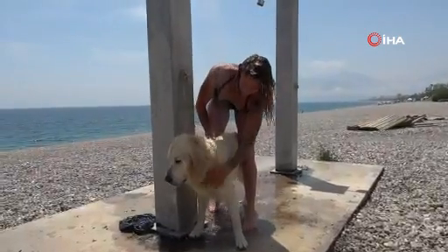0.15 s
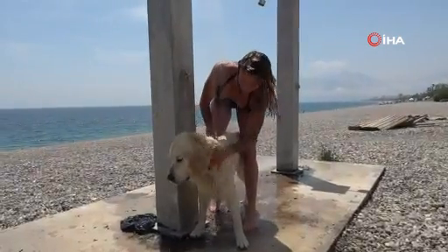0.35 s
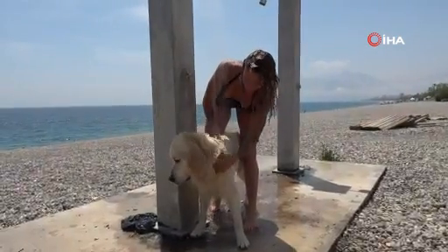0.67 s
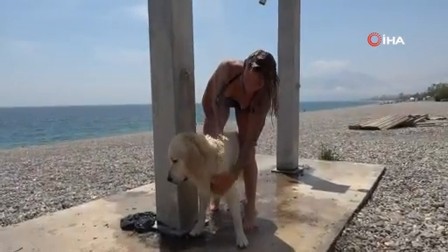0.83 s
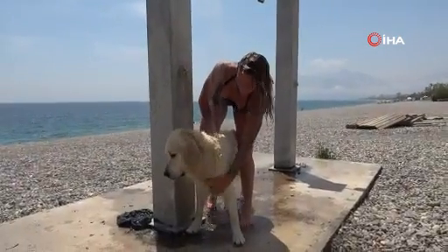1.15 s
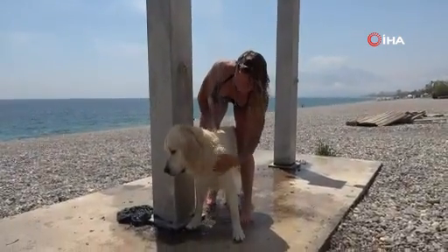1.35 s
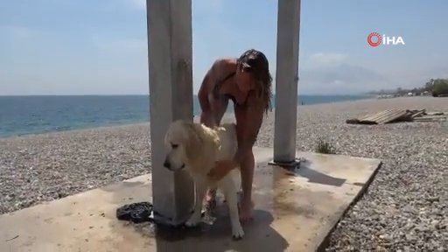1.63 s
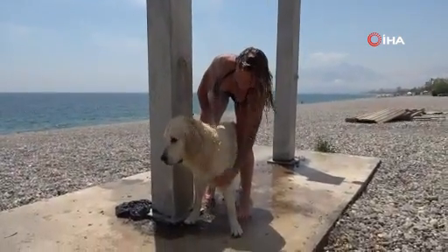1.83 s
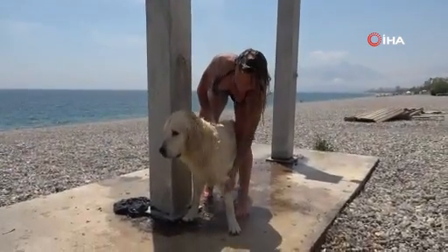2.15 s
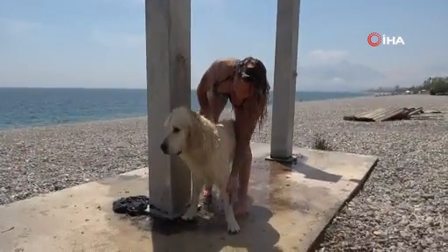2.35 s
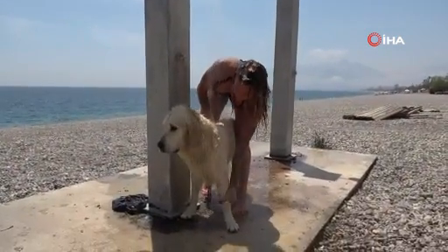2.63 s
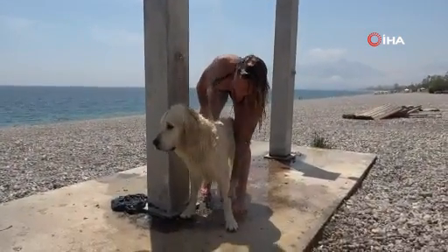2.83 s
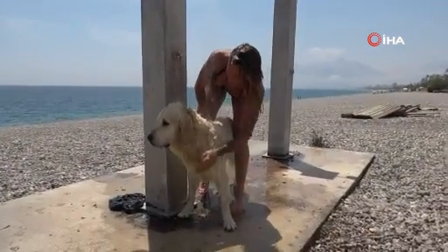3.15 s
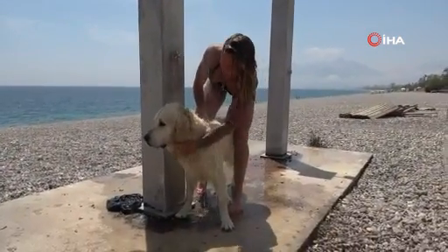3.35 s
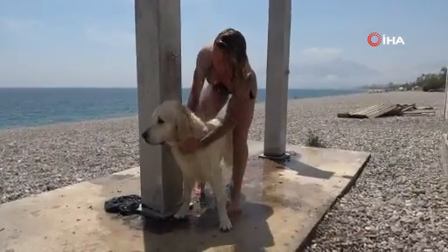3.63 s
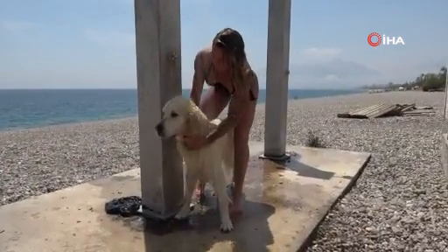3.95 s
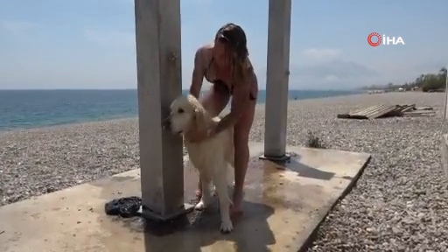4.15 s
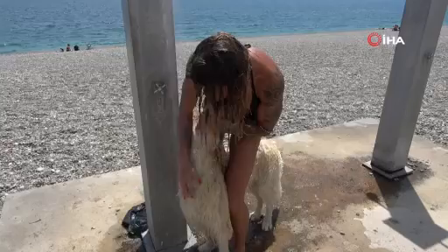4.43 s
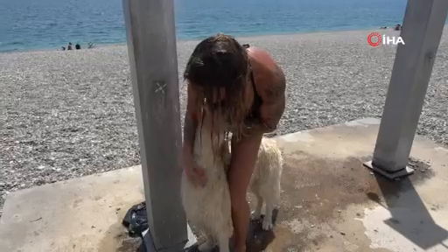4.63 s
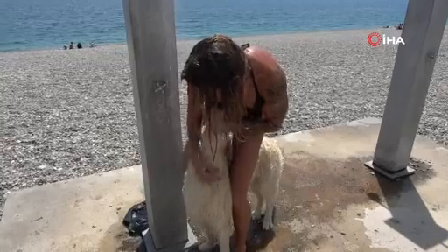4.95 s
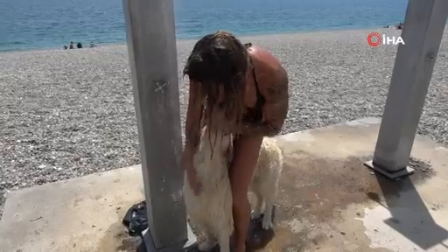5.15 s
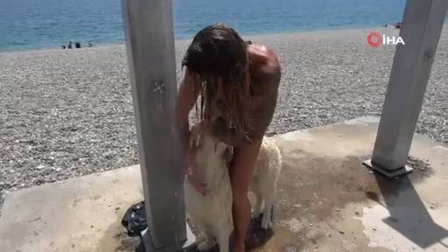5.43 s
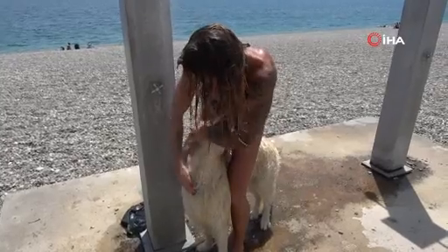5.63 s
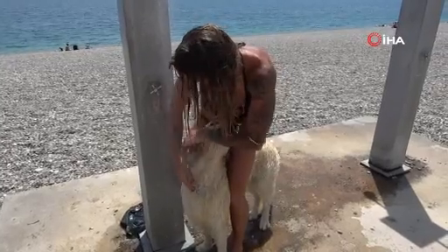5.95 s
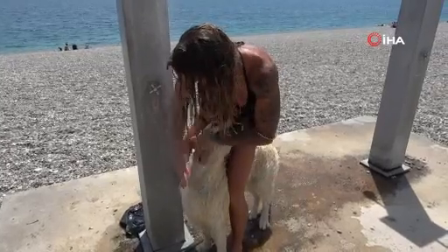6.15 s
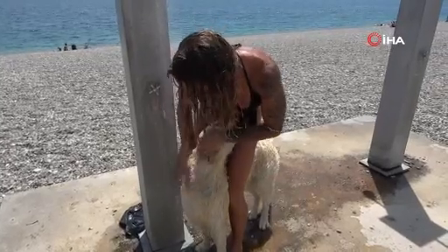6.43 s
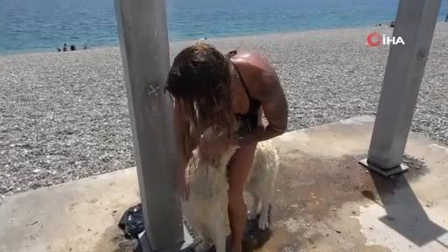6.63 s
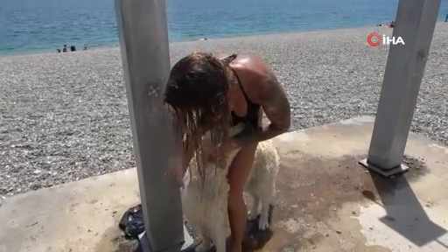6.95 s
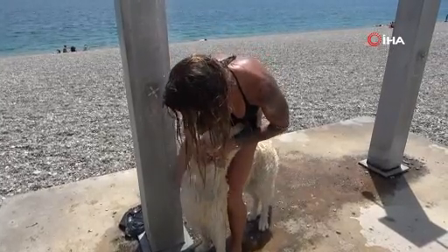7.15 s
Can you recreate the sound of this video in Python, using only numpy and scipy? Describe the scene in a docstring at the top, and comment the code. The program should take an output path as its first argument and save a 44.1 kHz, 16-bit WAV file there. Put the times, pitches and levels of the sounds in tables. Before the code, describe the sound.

A hand-held stereo microphone hears fine shower spray over faint, steady sea wash. At first the water is thin and distant, with occasional drops, hollow handling taps, short bursts of rumbling wind and two thin bird chirps. Past the middle a hard clunk and a tiny dip lead to a closer view: brighter hiss in uneven surges, many sharp slaps on wet concrete and rising drip plinks.

```python
"""An outdoor shower hisses onto a dog and a concrete pad on a pebble beach; later the spray is nearer.
Shaped noise and showers of tiny drop bursts make the spray; larger drops slap the wet concrete and
rising sine rings drip into puddles. Noise bursts through narrow resonances knock on the hollow housing
of the hand-held camera, bursts of low wind noise buffet its microphone, and a small bird chirps twice
in arched sines. Behind them lie the steady wash of the shore and faint swells of low band noise."""
import sys
import numpy as np
from scipy import signal
from scipy.fft import rfft, irfft, next_fast_len
from scipy.io import wavfile
from scipy.ndimage import uniform_filter1d

SR = 44100
rng = np.random.default_rng(int(sys.argv[2]) if len(sys.argv) > 2 else 0)


def store_pcm(level_fs):
    """Save levels as 16-bit WAV."""
    pcm = np.round(np.clip(level_fs, -1, 1) * 32767).astype(np.int16)
    wavfile.write(sys.argv[1], SR, np.atleast_2d(pcm).T)


N = 321489
TIME = np.arange(N) / SR
NEAR_S = 4.46  # from here on the spray is near

# resonances of the camera housing: centre_hz, width_hz, level_db
HOUSING_MODES = [(876, 28, -6), (1006, 62, 1.5), (1142, 39, -5.5), (1367, 53, -0.5), (1537, 39, 3),
                 (1728, 95, -2), (1960, 118, 2), (2067, 21, 6.5), (2243, 96, -1), (2940, 220, 0)]


def gain_of(db):
    """Decibels to gain."""
    return 10 ** (np.asarray(db) / 20)


def evened(x):
    """Scales to rms 1."""
    return x / np.sqrt(np.mean(x ** 2) + 1e-20)


def read(points, hz):
    """Reads a spectrum on a log-frequency axis."""
    f, value = np.transpose(points)
    return np.interp(np.log(hz + 1), np.log(f + 1), value)


def curve(rows, axis=1):
    """Gain over time from one dB column of a table."""
    columns = np.transpose(rows)
    return gain_of(np.interp(TIME, columns[0], columns[axis]))


def colour(x, points):
    """Gives a sound a spectrum, at rms 1."""
    length = x.shape[-1]
    size = next_fast_len(length + 512)
    gain = gain_of(read(points, np.fft.rfftfreq(size, 1 / SR)))
    return evened(irfft(rfft(x, size) * gain, size)[..., :length])


def band(x, hz, octaves):
    """A broad causal resonance around hz."""
    edges = np.clip([hz / 2 ** (octaves / 2), hz * 2 ** (octaves / 2)], 5, SR / 2.2)
    return signal.sosfilt(signal.butter(1, edges, "band", fs=SR, output="sos"), x)


def add(mix, s, sound):
    """Adds a sound to the mix at s seconds."""
    part = mix[:, max(round(s * SR), 0):][:, :sound.shape[-1]]
    part += sound[..., :part.shape[-1]]


def drift(db, rate_hz, count=24):
    """A gain that wanders by chance: sines of random phase up to rate_hz, db rms in all."""
    t = np.arange(0, N / SR + .01, .005)
    rates = np.geomspace(rate_hz / 10, rate_hz, count)
    wave = sum(np.sin(2 * np.pi * (hz * t + rng.random())) for hz in rates)
    return gain_of(db * np.interp(TIME, t, evened(wave)))


def patchy_noise(patchy_db, flicker_db):
    """Noise with short patches in time and frequency and a flicker shared by all bands."""
    z = signal.stft(rng.standard_normal((2, N)), nperseg=256)[2]
    across_hz = uniform_filter1d(rng.standard_normal(z.shape[1:]), size=7, axis=0)
    patches = evened(uniform_filter1d(across_hz, size=5, axis=1))
    flicker = evened(uniform_filter1d(rng.standard_normal(z.shape[-1]), size=5))
    gain = gain_of(patchy_db * patches + flicker_db * flicker)
    return signal.istft(z * gain, nperseg=256)[1][:, :N]


def shower(hiss_db=0.9, drops_db=-3.0, splatter_db=2.24, bubbles_db=-9, far_hiss_db=0.54, far_splatter_db=-3.0):
    """Mist and drops hiss; heavier water splatters lower down, with a faint fizz of bubbles."""
    # the far spray, before the trims above: time_s, hiss_db, splatter_db of the water running off
    far_spray = [(0.0, -51, -53.5), (0.58, -50, -57), (4.0, -51.5, -55), (4.35, -52.5, -60.5)]
    # spectrum of the fine spray: freq_hz, level_db per Hz
    hiss_spectrum = [(1500, -24.5), (2600, -26), (3500, -10), (4900, -7.5), (6500, 0), (9300, 1.5),
                     (10800, -0.5), (12400, 0.5), (14400, -3.5), (15200, -13.5)]
    # spectrum of the water running off: freq_hz, level_db per Hz
    splatter_spectrum = [(1000, -31), (1900, -6), (2600, -11.5), (3400, -7.5), (4800, -8), (6500, -3.5),
                         (10000, -27)]
    near_hiss_db, near_splatter_db = -48, -64  # before the hiss and splatter trims

    far, flutter = TIME < NEAR_S, drift(db=0.97, rate_hz=20)
    far_mist = gain_of(far_hiss_db) * curve(far_spray, axis=1)
    far_flow = gain_of(far_splatter_db) * curve(far_spray, axis=2)
    # the steady spray and the surges add as powers
    mist = np.hypot(np.where(far, far_mist, gain_of(near_hiss_db)), surges(axis=2))
    flow = np.hypot(np.where(far, far_flow, gain_of(near_splatter_db)), surges(axis=3))

    fine = evened(patchy_noise(patchy_db=1.9, flicker_db=1.47))
    water = fine + gain_of(drops_db) * droplets(spread_db=4.0)
    hiss = gain_of(hiss_db) * mist * colour(water, hiss_spectrum)
    sheet = evened(patchy_noise(patchy_db=3.5, flicker_db=0.5))
    runoff = sheet + gain_of(bubbles_db) * bubbles(per_s=350, spread_db=1.5, t60=0.0084)
    splatter = gain_of(splatter_db) * flow * colour(runoff, splatter_spectrum)
    return flutter * (hiss + splatter)


def surges(axis):
    """Water surges off the coat: each swells, sags while it runs and dies away; their powers add."""
    # surges, before the shower's trims: start_s, length_s to the release, hiss_db, splatter_db, rise_s
    surge_rows = [(0.143, 0.048, -50, -63, .02), (2.32, 0.053, -49.5, -54, .06),
                  (4.122, 0.031, -57, -50.5, .03), (4.647, 0.17, -42, -49.5, 0.13),
                  (4.957, 0.24, -42.5, -48, 0.034), (5.3, .37, -43.5, -51, .02),
                  (6.002, 0.042, -43, -53, 0.028), (6.126, .12, -45, -55.5, 0.021),
                  (6.285, .39, -40, -44, 0.17), (6.685, 0.32, -43.5, -53.5, 0.057),
                  (7.164, .12, -40, -53, 0.067)]
    sag_db_per_s, release_s = 6, 0.052
    power = np.zeros(N)
    for row in surge_rows:
        start, length, rise = row[0], row[1], row[4]
        age = np.maximum(TIME - start, 0)
        release = np.exp(-np.maximum(age - length, 0) / release_s)
        swell = np.minimum(age / rise, 1)
        power += (swell * gain_of(row[axis] - sag_db_per_s * age) * release) ** 2
    return np.sqrt(power)


def droplets(spread_db, count=24):
    """A rain of small drops of many sizes and pitches, landing by chance."""
    drops_per_s = 700  # over all pitches
    out = np.zeros((2, N))
    for hz in np.geomspace(3500, 12000, count):
        sizes = gain_of(spread_db * np.minimum(rng.exponential(1, N), 4))
        hits = sizes * (rng.random(N) < drops_per_s / count / SR)
        drop = splat(hz, t60=0.066, crack_s=0.0012, spatter_db=-10.5, octaves=1.34)
        out += signal.oaconvolve(hits[None], drop, axes=1)[:, :N]
    return evened(out)


def splat(hz, t60, crack_s, spatter_db, octaves, top_hz=12800, tail_db=-12):
    """One drop: a sharp crack, then the spatter of its fragments; peak 1."""
    t = np.arange(SR // 12) / SR
    fall = np.exp(-t / crack_s) + gain_of(tail_db - 60 * t / max(t60, .002))
    spatter = gain_of(spatter_db) * fall
    push = signal.unit_impulse(len(t)) + rng.standard_normal((2, len(t))) * spatter
    limits = [hz / 2.7, min(top_hz, SR / 2.2)]
    limiter = signal.butter(3, limits, "band", fs=SR, output="sos")
    sound = signal.sosfilt(limiter, band(push, hz, octaves))
    return sound / abs(sound).max(axis=1, keepdims=True)


def bubbles(per_s, spread_db, t60):
    """Many tiny bubbles ring in the film of water on the concrete."""
    out = np.zeros((2, N))
    for s, pitch, size, pan in rng.random((round(per_s * N / SR), 4)):
        level = gain_of(-spread_db * np.log(size + 0.015))
        plink = level * bubble(2700 * 2.4 ** pitch, t60)
        add(out, s * N / SR, plink * np.array([[1], [2 * pan - 1]]))
    return evened(out)


def bubble(hz, t60, rise=2):
    """The ring of a trapped bubble rises from hz as it dies."""
    t = np.arange(SR // 25) / SR
    return gain_of(-60 * t / t60) * np.sin(2 * np.pi * hz * t * (1 + rise * t))


def slaps(level_db=1.5):
    """Large drops fall from the wet coat onto the concrete, each a crack and a spatter."""
    # large drops and splashes: time_s (sounding 1 ms later), level_db before level_db above, centre_hz
    slap_rows = [(0.165, -25.5, 5900), (0.214, -30, 7680), (0.455, -30, 5900), (1.605, -31, 6700),
                 (2.0906, -21.5, 7750), (2.1105, -32, 8230), (2.4068, -27.5, 6900), (2.6115, -33, 8300),
                 (2.9926, -30.5, 8290), (3.038, -29.5, 6200), (3.5217, -28.5, 10500), (3.9175, -31, 7260),
                 (4.1046, -27.5, 6470), (4.157, -31, 3490), (4.1638, -25, 7740), (4.3859, -35, 4720),
                 (4.6673, -30, 11000), (4.9406, -26, 9160), (4.9866, -25.5, 6100), (4.99, -22.5, 7190),
                 (5.1504, -24, 7000), (5.3127, -26, 10500), (5.321, -24.5, 6500), (5.5273, -29, 9400),
                 (5.6488, -23, 7740), (5.7387, -22, 9400), (5.9463, -35, 9400), (5.9906, -29.5, 10400),
                 (6.0267, -26, 7360), (6.1155, -27, 8970), (6.1619, -25.5, 6100), (6.4667, -27.5, 4980),
                 (6.4877, -24, 5000), (6.5985, -21, 5860), (6.9508, -22, 8500), (7.1195, -27.5, 10000)]
    out = np.zeros((2, N))
    for s, db, hz in slap_rows:
        sound = splat(hz, t60=0.042, crack_s=0.0016, spatter_db=-11.0, octaves=0.43)
        add(out, s + 0.001, gain_of(db + level_db) * sound)
    return out


def drips(level_db=0, t60=0.023):
    """Single drips plink into the puddles, each the ring of a trapped bubble."""
    # drips: start_s, level_db, starting pitch_hz
    drip_rows = [(0.561, -45, 2720), (1.5279, -39.5, 3820), (4.9783, -40, 3500), (5.1265, -39, 3400),
                 (5.891, -44, 1530), (6.0267, -41, 3690), (6.339, -39, 2000), (6.4683, -34, 3900),
                 (6.498, -38, 3530), (6.5998, -39, 4750), (6.6128, -31.5, 3670), (7.226, -40, 2820)]
    out = np.zeros((2, N))
    for s, db, hz in drip_rows:
        add(out, s, gain_of(db + level_db) * bubble(hz, t60))
    return out


def knocks(soft_db=-1.0, hard_db=-1):
    """Soft knocks ring the housing, and one hard, rattling clunk has a ring of its own."""
    # soft knocks on the housing, before soft_db: start_s, level_db
    knock_rows = [(0.0833, -42), (0.1635, -42), (0.617, -34.5), (1.0124, -42), (1.116, -42.5),
                  (1.4348, -37), (1.9135, -31.5), (2.292, -34), (2.333, -34.5), (2.799, -36.5),
                  (2.8422, -40), (3.2914, -35.5), (3.691, -36), (4.0467, -36.5), (4.3708, -39),
                  (4.481, -33.5), (4.8797, -33.5), (5.0383, -41), (5.2977, -37), (5.414, -38),
                  (5.7633, -41), (6.163, -33), (6.338, -40), (6.6638, -37.5)]
    # the bumps of the clunk, before hard_db: start_s, level_db
    clunk_rows = [(4.1046, -23), (4.111, -26), (4.1536, -27)]
    # resonances of the clunk: centre_hz, width_hz, level_db
    clunk_modes = [(960, 21, -2.5), (1070, 46, -21), (1500, 30, -0.5), (1627, 12, -0.5), (2050, 42, 2),
                   (2210, 58, 1), (2480, 25, -19)]
    soft = bumps(knock_rows, HOUSING_MODES, t60=0.25, clatter_db=-6, grit_db=2.0, tick=0.67)
    hard = bumps(clunk_rows, clunk_modes, t60=.15, clatter_db=-5.5, grit_db=1.5, tick=0.34)
    return gain_of(soft_db) * soft + gain_of(hard_db) * hard


def bumps(rows, modes, t60, clatter_db, grit_db, tick):
    """Short gritty bumps, each a tick and a dying rattle, ring a hollow body."""
    # spectrum of the rattle: freq_hz, level_db per Hz
    clatter_spectrum = [(600, -47), (850, -14), (980, -7.5), (1250, 0.5), (1500, 1.5), (2200, -2),
                        (2550, -7), (3200, -11.5), (5000, -18), (9000, -52)]
    out, t = np.zeros((2, N)), np.arange(SR // 4) / SR
    fall = gain_of(-60 * t / t60) + tick * np.exp(-t / 0.0017)
    for s, db in rows:
        grit = gain_of(grit_db * evened(uniform_filter1d(rng.standard_normal(len(t)), size=130)))
        clatter = colour(rng.standard_normal((2, len(t))) * grit * fall, clatter_spectrum)
        sound = ring(clatter, modes) + gain_of(clatter_db) * clatter
        add(out, s, gain_of(db) * sound / abs(sound).max(axis=1, keepdims=True))
    return out


def ring(x, modes):
    """Passes a sound through narrow resonances, at rms 1."""
    return evened(sum(gain_of(db) * signal.lfilter(*signal.iirpeak(hz, hz / width, SR), x)
                      for hz, width, db in modes))


def wind(lumps_db=4.0, roar_octaves=0.89):
    """Bursts of low wind noise with abrupt edges: a low buffet and a lumpy, hollow roar."""
    # bursts of wind noise: start_s, end_s, buffet_db, roar_db at the middle, roar centre_hz,
    # left_minus_right_db (on top of the lean of the ports)
    burst_rows = [(0.273, 0.306, -54.5, -79, 300, 1), (0.812, 0.835, -56.5, -58, 80, 1),
                  (0.894, 0.972, -54.5, -45, 91, 2.5), (1.365, 1.435, -52.5, -43, 122, 0.5),
                  (1.806, 2.092, -53.5, -49, 205, 2), (2.808, 2.959, -55.5, -61, 400, -1),
                  (2.941, 3.526, -52, -46, 359, -2), (4.363, 4.394, -65, -57, 700, -2),
                  (4.395, 4.423, -55.5, -57, 660, 0)]
    # spectrum of the buffet: freq_hz, level_db per Hz
    buffet_spectrum = [(20, -3), (50, -12), (90, 0.5), (200, -2.5), (330, -6), (600, -7.5), (900, -5.5),
                       (1000, -12), (1400, -60)]
    out = np.zeros((2, N))
    for start, end, buffet_db, roar_db, hz, left_db in burst_rows:
        u = np.linspace(0, 1, max(round((end - start) * SR), 256))
        air, eddies = rng.standard_normal((2, 2, SR))
        wander = evened(uniform_filter1d(rng.standard_normal(SR), size=800))
        lumps = gain_of(lumps_db * wander[:len(u)])
        hollow = band(band(eddies, hz, roar_octaves), hz, roar_octaves)[:, -len(u):]
        roar = evened(hollow * lumps) * np.sin(np.pi * u)
        buffet = colour(air[:, :len(u)] * np.sqrt(lumps), buffet_spectrum)
        burst = ports(gain_of(buffet_db) * buffet + gain_of(roar_db) * roar)
        edges = signal.windows.tukey(len(u), min(0.016 * SR / len(u), 1))
        add(out, start, burst * edges * gain_of([[left_db / 2], [-left_db / 2]]))
    return out


def bird():
    """A small bird gives two thin arched chirps, each a gliding sine."""
    # chirps: start_s, length_s, level_db
    chirp_rows = [(0.852, .042, -57), (2.01, 0.052, -50.5)]
    # glide of each chirp: share of its length, pitch_hz
    chirp_glide = [(0, 3800), (.2, 4850), (.35, 4850), (.65, 4650), (1, 4050)]
    out = np.zeros((2, N))
    for s, length, db in chirp_rows:
        u = np.linspace(0, 1, round(length * SR))
        turns = np.cumsum(np.interp(u, *np.transpose(chirp_glide))) / SR
        add(out, s, gain_of(db) * np.sin(2 * np.pi * turns) * signal.windows.tukey(len(u), .14))
    return out


def shore(ring_db=-4):
    """A distant, steady wash of patchy noise, tinted by the resonances of the housing."""
    # spectrum of the wash: freq_hz, level_db per Hz
    wash_spectrum = [(20, -37), (70, -32), (150, -10.5), (400, -11), (700, -9.5), (885, -18), (1000, -1),
                     (1250, -2.5), (1600, -2), (2200, -8.5), (2600, -5.5), (5000, -19.5)]
    early_db, late_db = -57.5, -58.5  # before and after the spray is near
    wash = colour(patchy_noise(patchy_db=1.75, flicker_db=-0.4), wash_spectrum)
    level = gain_of(np.where(TIME < NEAR_S, early_db, late_db)) * drift(db=1.0, rate_hz=2.002)
    return level * evened(wash + gain_of(ring_db) * ring(wash, HOUSING_MODES))


def faint_swells(centre_hz=265, rumble_db=2):
    """Soft, faint swells of band noise around 265 Hz over a faint rumble."""
    # swells of band noise: middle_s, level_db
    swell_rows = [(1.52, -59.5), (2.23, -60.5), (2.5, -65.5), (3.63, -61.5)]
    # faint rumble, before rumble_db: time_s, level_db
    rumble_rows = [(0, -67.5), (.5, -79), (1.3, -69), (2.6, -84), (3.9, -86), (4.3, -69.5), (4.8, -80),
                   (5.7, -74.5), (7.29, -74.5)]
    half_width_s = 0.057
    swells = sum(gain_of(db) / (1 + ((TIME - s) / half_width_s) ** 2) for s, db in swell_rows)
    noise = band(band(rng.standard_normal((2, N)), centre_hz, 0.75), centre_hz, 0.75)
    swelling = swells * evened(noise)
    level = curve(rumble_rows) * drift(db=2.5, rate_hz=6)
    rumble = level * evened(band(band(rng.standard_normal((2, N)), 44, 3.7), 44, 3.7))
    return swelling + gain_of(rumble_db) * rumble


def ports(x):
    """Two microphone ports hear nearly the same sound; the left is mostly louder and leads in the treble."""
    # left-right likeness: freq_hz, coherence (no unit)
    likeness = [(40, 0.96), (150, 0.6), (550, 0.72), (1000, 0.93), (3000, 1), (5200, 0.87), (8000, 0.84),
                (11700, 0.87)]
    # level of the left over the right: freq_hz, left_minus_right_db
    left_over_right = [(100, 2), (300, 0), (1100, 2), (1900, 3.5), (3000, 2), (5500, 1), (8700, 2.5),
                       (9700, 6.5), (10800, -4.5), (11700, 3.5), (15000, 2)]
    # phase lead of the left over the right: freq_hz, lead_rad
    left_phase = [(4500, 0.051), (5900, 1.2), (7600, 0.98), (10000, 0.53), (11150, 0.88), (11550, 0.068)]
    size = next_fast_len(x.shape[-1])
    # row 0 is common to both ports, row 1 sets them apart
    hz, (shared, own) = np.fft.rfftfreq(size, 1 / SR), rfft(x, size)
    same = np.clip(read(likeness, hz), -1, 1)
    mid, side = shared * np.sqrt((1 + same) / 2), own * np.sqrt((1 - same) / 2)
    # each port takes half of the difference
    lean = gain_of(read(left_over_right, hz) / 2) * np.exp(.5j * read(left_phase, hz))
    return irfft(np.array([(mid + side) * lean, (mid - side) / lean]), size)[:, :x.shape[-1]]


def scene():
    """Shower, shore, wind and bird in the open air, and the knocks of the hand-held camera."""
    around = shower() + slaps() + drips() + knocks() + shore() + faint_swells() + bird()
    return ports(around) + wind()  # each burst of wind noise passes the ports by itself


def record(dry):
    """The level dips briefly once, and a low-pass limits the band."""
    dip_s, dip_db, half_width_s, edge_hz = 4.461, -35, 0.0045, 15250
    dip = gain_of(dip_db / (1 + ((TIME - dip_s) / half_width_s) ** 2))
    lowpass = signal.firwin(401, edge_hz, window=("kaiser", 9), fs=SR)
    return signal.oaconvolve(dry * dip, lowpass[None], "same")


dry = scene()
out = record(dry)
store_pcm(out)
```